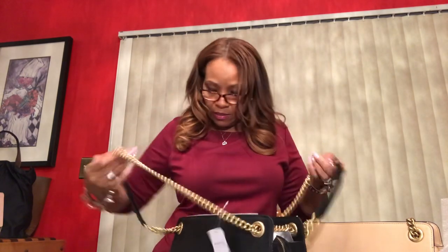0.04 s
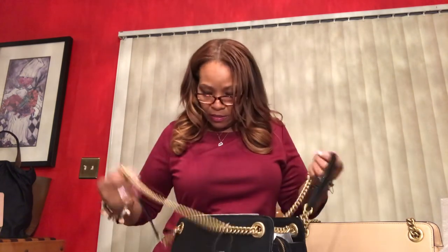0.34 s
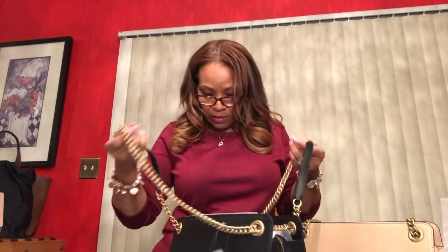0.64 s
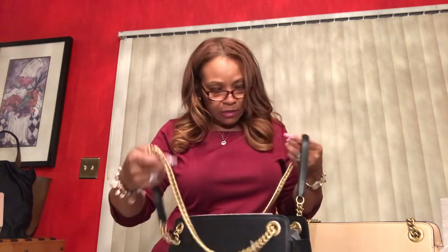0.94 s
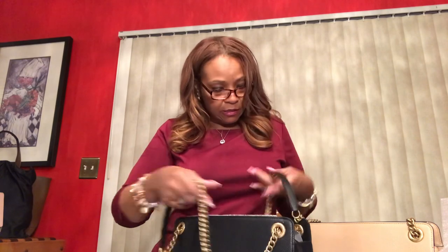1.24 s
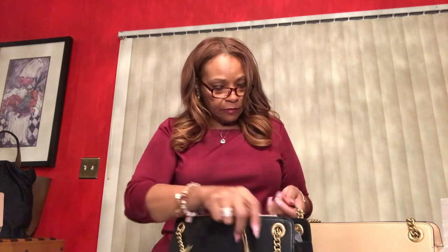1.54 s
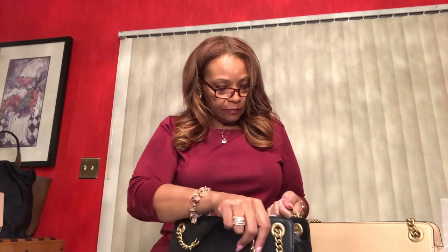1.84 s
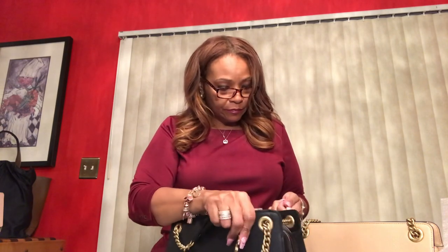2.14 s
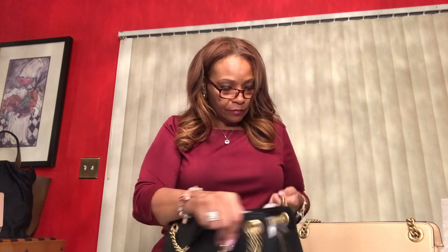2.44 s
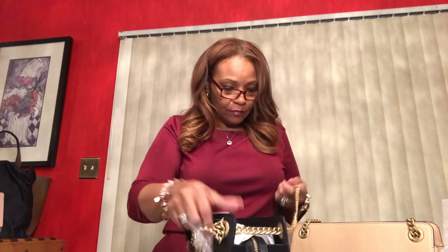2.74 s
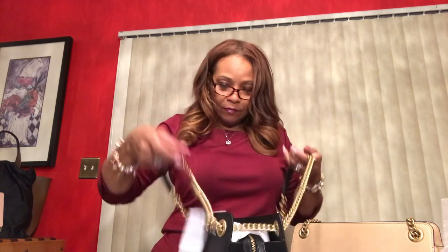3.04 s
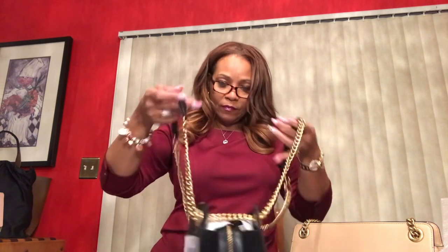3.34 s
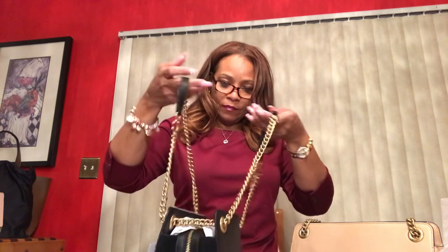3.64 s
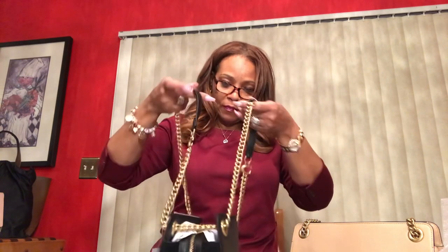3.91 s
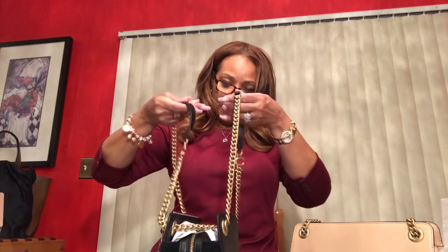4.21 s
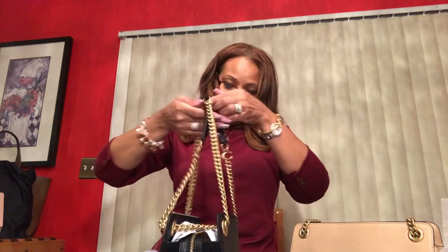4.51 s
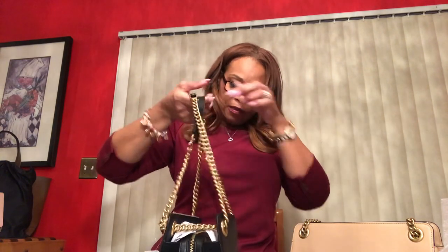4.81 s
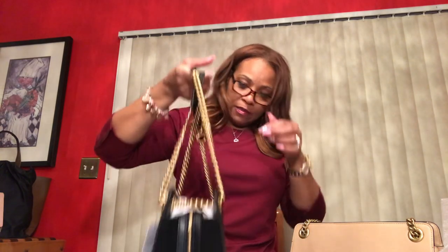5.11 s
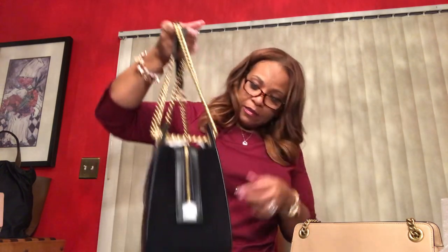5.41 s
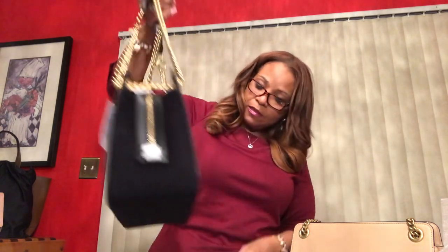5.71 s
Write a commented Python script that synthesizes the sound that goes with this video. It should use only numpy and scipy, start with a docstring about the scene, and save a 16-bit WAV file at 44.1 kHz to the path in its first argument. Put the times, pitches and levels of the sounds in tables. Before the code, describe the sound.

A new leather handbag is handled about a metre from the microphone in a quiet, small room. Its chain strap swishes, clinks and runs over the eyelets, with dull bumps on the hollow body. Paper wrapping rustles up to a loud crackle with sharp metal clacks. More short rustles follow, then thin out to a bright click of strap fittings and a few faint ticks. Ventilation murmurs underneath.

```python
"""A quiet room: a new handbag is handled about a metre away.
Its chain strap and paper wrapping slide and rustle in short strokes that also shake the hollow
leather body. Links clink and pour over the eyelets, paper creases snap, fittings click together,
and hands and strap bump the bag. Ventilation murmurs underneath."""
import sys
import numpy as np
from scipy import signal
from scipy.fft import rfft, irfft
from scipy.io import wavfile

SR = 44100
rng = np.random.default_rng(int(sys.argv[2]) if len(sys.argv) > 2 else 0)


def inscribe(sig):
    """Save sig as 16-bit PCM at rate SR to the path in sys.argv[1].

    A 1-D sig is mono; a 2-D sig holds one channel per row.
    Samples are clipped to [-1, 1] before scaling.
    """
    pcm = np.round(np.clip(np.atleast_2d(sig).T, -1, 1) * 32767)
    wavfile.write(sys.argv[1], SR, pcm.astype(np.int16))


N = 253927
T = np.arange(N) / SR
EVENT_SAMPLES = 12000


def undb(db):
    """Decibels to gain."""
    return 10 ** (np.asarray(db) / 20)


def unit(response):
    """Scale to unit energy."""
    return response / np.sqrt(np.sum(response ** 2))


def peak(x):
    """Scale to peak 1."""
    return x / np.max(np.abs(x))


def through(x, response):
    """Convolve, keeping the length."""
    return signal.oaconvolve(x, response)[:len(x)]


def butter(x, order, edge_hz, kind="low"):
    """Butterworth filter."""
    return signal.sosfilt(signal.butter(order, edge_hz, kind, fs=SR, output="sos"), x)


def add(out, start_s, sound):
    """Mix a sound in at start_s."""
    start = int(np.clip(start_s * SR, 0, N - 1))
    out[start:start + len(sound)] += sound[:N - start]


def colour(points, size=4096):
    """Minimum-phase impulse response from (freq_hz, level_db) points."""
    freq_hz, level_db = np.transpose(points)
    bins_hz = np.maximum(np.arange(size // 2 + 1), 1) * SR / size
    magnitude = undb(np.interp(np.log(bins_hz), np.log(freq_hz), level_db))
    cepstrum = irfft(np.log(magnitude))
    cepstrum[1:size // 2] *= 2
    cepstrum[size // 2 + 1:] = 0
    return unit(irfft(np.exp(rfft(cepstrum))))


def fade(t60_s, size=EVENT_SAMPLES):
    """Exponential decay."""
    return np.exp(-np.log(1000) * T[:size] / t60_s)


def release(after_s, t60_s):
    """Gain of 1 until after_s, then decay."""
    return undb(-60 * np.maximum(T - after_s, 0) / t60_s)


def ring(modes, detune, scatter_db, size=EVENT_SAMPLES):
    """Decaying modes; pitch and balance vary with the contact point."""
    out = np.zeros(size)
    for freq_hz, level_db, t60_s in modes:
        freq_hz *= 1 + detune * rng.standard_normal()
        level_db += scatter_db * rng.standard_normal()
        out += undb(level_db) * fade(t60_s, size) * np.sin(2 * np.pi * freq_hz * T[:size])
    return out


def grains(per_s, spread_db):
    """Tiny random slips of uneven size, rms near 1."""
    sizes = undb(spread_db * np.clip(rng.standard_normal(N), -2, 2)) * rng.choice([-1, 1], N)
    chance = np.clip(per_s / SR, 0, 1)
    return (rng.random(N) < chance) * sizes / np.std(sizes) / np.sqrt(chance)


def rattle(t60_s, per_s, size=EVENT_SAMPLES):
    """One contact, then dying random rebounds."""
    rebounds = (rng.random(size) < per_s / SR) * rng.standard_normal(size)
    rebounds[0] = 1
    return rebounds * fade(t60_s, size)


def tick(low_hz, high_hz, t60_s, crack_db=6, crack_t60_s=0.017):
    """Band-limited crack and brief chatter, peak 1."""
    envelope = fade(t60_s) + undb(crack_db) * fade(crack_t60_s)
    burst = rng.standard_normal(EVENT_SAMPLES) * envelope
    return peak(butter(burst, 3, [low_hz, high_hz], "band"))


# Ventilation spectrum: freq_hz, level_db
VENT_SPECTRUM = [(15, -82), (25, -27.5), (62, -9.5), (152, -1.5), (178, -7), (215, -1.5), (260, -8),
                 (281, -14), (313, -10), (457, -18.5), (582, -24), (804, -25.5), (919, -28), (2120, -26.5),
                 (15500, -41)]


def ventilation(level_db=-59.5):
    """Steady low murmur with faint hiss."""
    return undb(level_db) * through(rng.standard_normal(N), colour(VENT_SPECTRUM, size=16384))


# Gliding strap spectrum: freq_hz, level_db
GLIDE_SPECTRUM = [(500, -4), (3000, -10.5), (5000, -7), (6000, 3), (7500, -1), (9500, -3.5), (11500, -5),
                  (13000, -7), (16000, -17)]


def strap_glide(level_db=-57.5, hold_s=0.037, t60_s=0.37):
    """The strap swishes through the hand, then slows."""
    swish = through(grains(per_s=10000, spread_db=3), colour(GLIDE_SPECTRUM))
    return undb(level_db) * release(hold_s, t60_s) * swish


# Chain link modes: freq_hz, level_db, t60_s
LINK_MODES = [(5570, -16, .025), (7140, -12, .045), (8020, -11, .04), (9530, -8, .05), (12200, -7, .03),
              (12560, -6, .04), (13230, -3, .05), (13520, 0, .07), (13850, -4, .05), (14200, -8, .04),
              (15200, -2, .055)]
# Sliding link spectrum: freq_hz, level_db
CHAIN_SPECTRUM = [(200, -16), (600, 4), (1100, 2), (1800, 0), (2300, -1.5), (4000, 2), (6000, -0.5),
                  (9000, -1.5), (13000, 1), (16000, -9)]
# Free links colliding: start_s, peak_db
LINK_CLINKS = [(0.1136, -50), (0.2227, -34.5), (0.3042, -46.5), (0.3494, -47), (1.059, -40), (1.079, -51),
               (1.17, -41), (1.19, -35.5), (1.199, -37.5), (1.228, -48), (1.493, -40), (1.515, -37)]


def link_clinks(scrape_db=-11, rise_s=0.0025, link_count=4, size=4000):
    """Small links fall together, rebound, scrape and ring very high, no two alike."""
    out = np.zeros(N)
    onset = np.clip(T[:size] / rise_s, 0, 1)
    for start_s, peak_db in LINK_CLINKS:
        links = np.zeros(size)
        for _ in range(link_count):
            rebounds = rattle(t60_s=0.04, per_s=400, size=size)
            links += through(rebounds, ring(LINK_MODES, detune=0.009, scatter_db=3, size=size))
        scrape = through(rattle(t60_s=0.071, per_s=6400, size=size), colour(CHAIN_SPECTRUM))
        clink = onset * (peak(links) + undb(scrape_db) * peak(scrape))
        add(out, start_s, undb(peak_db) * peak(clink))
    return out


# Crease snaps: start_s, level_db
PAPER_CREASES = [(0.19, -35), (0.2195, -28), (0.2373, -37), (0.243, -33), (0.357, -39), (0.851, -44),
                 (1.296, -38), (1.7477, -35.5), (2.024, -32.5), (2.1001, -36), (2.198, -39), (2.364, -33),
                 (2.386, -21), (2.5186, -11), (2.5225, -18), (2.817, -34.5), (2.9665, -36.5),
                 (2.9792, -36.5), (3.3833, -41), (3.5846, -36), (3.766, -34), (4.8344, -47), (5.6245, -46)]


def paper_creases(gain_db=-4.5):
    """Paper creases snap, all in one wide, bright band."""
    out = np.zeros(N)
    for start_s, level_db in PAPER_CREASES:
        add(out, start_s, undb(level_db + gain_db) * tick(low_hz=2380, high_hz=15600, t60_s=0.022))
    return out


def stutter(per_s, depth_db):
    """Gain of a surface catching and letting go, rms 1."""
    wander = np.interp(T * per_s, np.arange(N), rng.standard_normal(N))
    gain = undb(depth_db * np.clip(wander, -2, 1.8))
    return gain / np.sqrt(np.mean(gain ** 2))


def folds(per_s, t60_s=0.046, count=3):
    """Slips and sparser snaps on folds and links, each with its own short, dense ring."""
    out = np.zeros(N)
    for _ in range(count):
        slips = grains(per_s / count, spread_db=4.5)
        snaps = grains(0.08 * per_s / count, spread_db=2)
        contact = undb(-1) * slips + undb(-7.5) * snaps
        sheet = unit(rng.standard_normal(EVENT_SAMPLES) * fade(t60_s))
        out += undb(-2) * contact + undb(-3.5) * through(contact, sheet)
    return out / np.sqrt(count)


# Chain and wrapping strokes: start_s, level_db, swell_s, hold_s, t60_s, hiss_rel_db, body_rel_db
SLIDE_STROKES = [ (0.191, -56.5, 0.031, 0.018, 0.24, 3.5, -22),
                 (0.317, -62.5, 0.039, 0.013, 0.26, 0.5, 4.5), (0.895, -71.5, 0.023, .015, 0.15, 6, 3),
                 (1.17, -71, .02, 0.016, 0.9, -6, 11.5), (1.78, -63.5, 0.023, 0.045, 0.87, 0, 0),
                 (1.946, -53, 0.029, 0.056, 0.49, 1, -2.5), (2.103, -52.5, 0.011, 0.0073, 0.11, 1.5, 2),
                 (2.195, -53, 0.0035, 0.012, 0.18, 0.5, 1), (2.284, -59, .004, 0.018, 0.45, 3, 1),
                 (2.362, -39.5, 0.061, .1, 0.21, 3, 4), (2.6, -59.5, 0.02, 0.037, .9, -4, 0),
                 (2.809, -65.5, 0.0047, 0.015, 0.54, 4.5, -2), (2.945, -59, 0.047, 0.067, 0.81, -4, 5),
                 (3.03, -48.5, 0.05, 0.077, 0.63, 1.5, 2.5), (3.262, -58, .004, .02, .25, -4, 0.5),
                 (3.343, -48.5, 0.013, 0.11, 0.21, 2.5, 3.5), (3.57, -66, .004, 0.0092, 1, 1.5, 1.5),
                 (3.753, -61, .005, 0.0073, 0.27, 4, 6.5), (3.861, -65.5, 0.018, 0.016, 0.14, 2.5, 9),
                 (4.088, -71, 0.0087, 0.078, 0.35, 3.5, 8), (4.467, -72.5, 0.033, 0.096, 0.31, 2.5, 3),
                 (4.75, -61.5, 0.0072, 0.022, 0.26, 3, -1), (4.897, -72.5, 0.019, .02, 0.63, 1, 7)]


def stroke_gains(grip_s=0.006, swell_db=7):
    """Crackle, hiss and body gains; each stroke grips, swells, holds and dies away."""
    power = np.zeros((3, N))
    for start_s, level_db, swell_s, hold_s, t60_s, hiss_rel_db, body_rel_db in SLIDE_STROKES:
        grip = np.clip(1 + (T - start_s) / grip_s, 0, 1)
        swell = undb(swell_db * np.clip((T - start_s) / swell_s - 1, -1, 0))
        effort = grip * swell * release(start_s + swell_s + hold_s, t60_s)
        gains = undb([level_db, level_db + hiss_rel_db, level_db + body_rel_db])
        power += np.outer(gains, effort) ** 2
    return np.sqrt(power)


# Rustle crackle spectrum: freq_hz, level_db
CRACKLE_SPECTRUM = [(100, -31), (350, 3), (650, -4.5), (1100, 0.5), (1350, -1), (1650, 0), (2150, 2),
                    (3050, 2.5), (3800, -1), (4900, -3.5), (6200, 0), (7500, -26), (10000, -18),
                    (16000, -32)]
# Fine hiss spectrum: freq_hz, level_db
HISS_SPECTRUM = [(2000, -70), (5000, -11.5), (7500, -1), (10000, 0), (13500, 2), (16000, -3)]
# Rubbed bag modes: freq_hz, level_db, t60_s
BODY_MODES = [(102, -4, 0.065), (154, -7.5, 0.11), (206.6, 2.5, 0.12), (270, 7.5, 0.059),
              (318.3, 2.5, 0.07), (354, -4.5, 0.042), (458, 1.5, 0.012), (587, 2, 0.025),
              (660, -4.5, 0.034), (742, 0.5, 0.023), (845, -7, 0.024), (920, -7.5, 0.032), (998, -4, 0.037),
              (1140, -14, 0.054)]


def rustle(busy_db=-45):
    """Chain and paper slide; harder strokes set off more slips, and the drag shakes the hollow bag."""
    rub, fine, drag = stroke_gains()
    catch = stutter(per_s=170, depth_db=2)
    contact = folds(per_s=120 + 4000 * (rub / undb(busy_db)) ** 0.8) * catch
    crackle = through(contact * rub * stutter(per_s=150, depth_db=1.5), colour(CRACKLE_SPECTRUM))
    hiss = through(contact * fine, colour(HISS_SPECTRUM))
    shake = grains(per_s=1500, spread_db=2.5) * drag * catch
    body = through(shake, unit(np.diff(ring(BODY_MODES, detune=0.0023, scatter_db=1.4))))
    body = butter(body, 1, 300)  # soft leather rounds the top
    body = butter(body, 2, 85, "high")  # a small bag radiates no deep bass
    return undb(-1) * crackle + undb(-1.5) * hiss + undb(5) * body


# Panel modes, soft contact: freq_hz, level_db, t60_s
THUD_MODES = [(149.5, -14.5, 0.08), (233.4, 6.5, 0.066), (282, -2, 0.02)]
# Panel modes, hard contact: freq_hz, level_db, t60_s
KNOCK_MODES = [(456, -8, 0.011), (591, 2.5, 0.018), (747, 1, 0.02), (830, 0.5, 0.018), (963, 3, 0.013),
               (1350, -4.5, 0.016), (2100, -11, 0.017)]
# Hand and strap bumps: start_s, peak_db, knock_rel_db, thud_pitch_ratio
BAG_BUMPS = [(0.2076, -33, -0.5, 1.02), (0.326, -44, -19, 0.82), (1.1936, -32.5, 14, 0.89),
             (1.489, -49.5, 6, 1.34), (1.600, -40.5, -14, 1.143), (1.615, -37.5, -4.5, 0.98),
             (1.728, -37.5, 6.5, 1.08), (2.039, -44.5, -9, 0.976), (2.124, -39.5, -13, 1.08),
             (2.811, -44, -2.5, 0.89), (3.585, -46.5, -1, 0.88)]


def bag_bumps(bend=0.43, settle_s=0.0065, base_rise_s=0.0027, rise_halving_db=22):
    """A dull thud sags in pitch as the leather relaxes; harder contact rises faster and knocks."""
    out = np.zeros(N)
    t = T[:EVENT_SAMPLES]
    sagging_s = t + bend * settle_s * (1 - np.exp(-t / settle_s))
    for start_s, peak_db, knock_rel_db, thud_pitch_ratio in BAG_BUMPS:
        rise_s = base_rise_s * 2 ** (-knock_rel_db / rise_halving_db)
        panels = ring(THUD_MODES, detune=0.0071, scatter_db=6.5)
        thud = np.interp(thud_pitch_ratio * sagging_s, t, panels) * (1 - np.exp(-(t / rise_s) ** 2))
        knock = ring(KNOCK_MODES, detune=0.025, scatter_db=1) * (1 - np.exp(-t / 0.001))
        add(out, start_s, undb(peak_db) * peak(peak(thud) - undb(knock_rel_db) * peak(knock)))
    return out


def idle_links(start_s=0.42, end_s=4.6, gain_db=-81):
    """Single links shift and tick faintly while both hands hold the chain."""
    held = (T > start_s) & (T < end_s)
    shifts = grains(per_s=44, spread_db=0.5) * held
    ticks = through(shifts, unit(rattle(t60_s=0.027, per_s=2800)))
    return undb(gain_db) * through(ticks, colour(HISS_SPECTRUM) + 1.2 * colour(CHAIN_SPECTRUM))


# Metal hitting eyelets: start_s, level_db, low_hz, high_hz
EYELET_CLACKS = [(0.607, -45, 940, 3340), (2.2147, -36, 1800, 4800), (2.4195, -23, 3000, 6400),
                 (2.4682, -19, 1450, 7200), (2.534, -19, 1300, 6500), (2.6182, -31, 2390, 5160),
                 (2.7776, -42, 3080, 9100), (3.04, -38, 1400, 4930), (3.1455, -33, 1250, 7200),
                 (3.278, -37, 1800, 5600), (4.105, -42.5, 1680, 3360), (4.5697, -43.5, 1350, 3420),
                 (5.073, -41.5, 1140, 6030)]


def eyelet_clacks(gain_db=-1, mean_rebound_s=0.009, rebound_db=-12):
    """Links and rings clack against the eyelets and fall back once."""
    out = np.zeros(N)
    for start_s, level_db, low_hz, high_hz in EYELET_CLACKS:
        clack = undb(level_db + gain_db) * tick(low_hz, high_hz, t60_s=0.013)
        add(out, start_s, clack)
        add(out, start_s + mean_rebound_s * (0.5 + rng.random()), undb(rebound_db) * clack)
    return out


# Chain and eyelet resonances: freq_hz, width_hz, level_db
EYELET_RESONANCES = [(1157, 19, 4.5), (1820, 100, 8), (2100, 47, 2), (2296, 77, 7.5), (2930, 15.4, -3.5),
                     (3020, 28, -5), (3270, 81, -4), (3930, 38, -5), (4110, 22, -1), (4940, 22, -8),
                     (5370, 18, -3), (6060, 48, -3), (6400, 40, -2), (6410, 34, -14), (6960, 92, -2),
                     (6860, 30, -4), (7000, 27, -8), (7450, 22, 0), (8270, 20, -2), (8900, 140, -10)]
# Chain running onto the bag: start_s, level_db, rise_s, hold_s, t60_s
CHAIN_RUNS = [(1.509, -40, 0.012, 0.03, 0.14), (1.578, -53.5, 0.011, 0.032, 0.34),
              (1.66, -46, 0.0038, 0.01, 0.23), (1.756, -52, .015, 0.011, 0.31)]


def chain_runs(scrape_db=-3, ring_db=-5, stretch_count=2):
    """Hundreds of link contacts pour over the eyelets; each stretch of chain rings differently."""
    flow = np.zeros(N)
    for start_s, level_db, rise_s, hold_s, t60_s in CHAIN_RUNS:
        onset = np.clip((T - start_s) / rise_s, 0, 1)
        flow += undb(level_db) * onset * release(start_s + rise_s + hold_s, t60_s)
    modes = [(freq_hz, level_db, np.log(1000) / (np.pi * width_hz))
             for freq_hz, width_hz, level_db in EYELET_RESONANCES]
    metal = np.zeros(N)
    for _ in range(stretch_count):
        contacts = grains(per_s=5000, spread_db=1.5) * flow
        metal += through(contacts, unit(ring(modes, detune=0.0027, scatter_db=1)))
    scrape = through(grains(per_s=7400, spread_db=3.5) * flow, colour(CHAIN_SPECTRUM))
    return undb(scrape_db) * scrape + undb(ring_db) * metal / np.sqrt(stretch_count)


# Strap fitting modes: freq_hz, level_db, t60_s
FITTING_MODES = [(2900, -9, .03), (4050, -3, .04), (4700, -7, .03), (5380, 0, .08), (5520, -1, .07),
                 (5800, -1, .05), (6300, -1, .05), (7600, -1, .04), (9200, -2, .04), (10620, -3, .04)]
# Fittings meeting: start_s, level_db
FITTING_CLICKS = [(4.6616, -32), (4.738, -42)]


def fitting_clicks(ring_db=-10, chatter_db=-13):
    """The two straps' heavier fittings meet with a bright scrape, chatter on and ring faintly."""
    out = np.zeros(N)
    for start_s, level_db in FITTING_CLICKS:
        blows = rattle(t60_s=0.031, per_s=12000) + undb(-22) * rattle(t60_s=0.3, per_s=2100)
        metal = through(blows, ring(FITTING_MODES, detune=0.002, scatter_db=1))
        scrape = through(rattle(t60_s=0.028, per_s=30000), colour(HISS_SPECTRUM))
        chatter = through(rattle(t60_s=0.34, per_s=7200), colour(CHAIN_SPECTRUM))
        click = peak(scrape) + undb(ring_db) * peak(metal) + undb(chatter_db) * peak(chatter)
        add(out, start_s, undb(level_db) * click)
    return out


def room(x, wet_db=-9, low_t60_s=0.36, high_t60_s=0.38, split_hz=5000, delay_s=0.0054):
    """A small furnished room adds a short diffuse tail."""
    noise = rng.standard_normal(EVENT_SAMPLES)
    low = butter(noise, 2, split_hz)
    tail = low * fade(low_t60_s) + (noise - low) * fade(high_t60_s)
    tail *= T[:EVENT_SAMPLES] > delay_s
    return x + undb(wet_db) * through(x, unit(tail))


def scene():
    """Bag handling in the room, over the ventilation; mono."""
    chain = strap_glide() + chain_runs() + link_clinks() + fitting_clicks() + idle_links()
    handling = chain + rustle() + paper_creases() + eyelet_clacks() + bag_bumps()
    return (room(handling) + ventilation())[None]


def record(dry, low_hz=45, top_hz=16000):
    """The microphone thins the deep bass; the recorder cuts the top."""
    thinned = butter(dry, 5, low_hz, "high")
    return signal.sosfilt(signal.ellip(10, 0.2, 80, top_hz, fs=SR, output="sos"), thinned)


dry = scene()
out = record(dry)
inscribe(out)
```